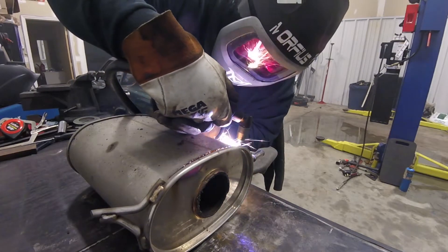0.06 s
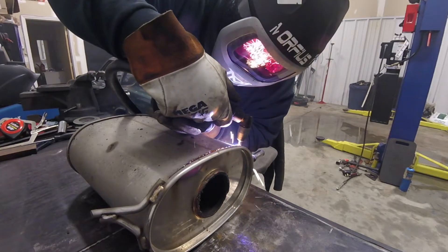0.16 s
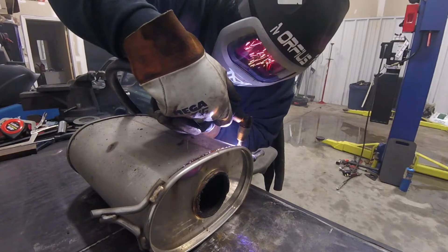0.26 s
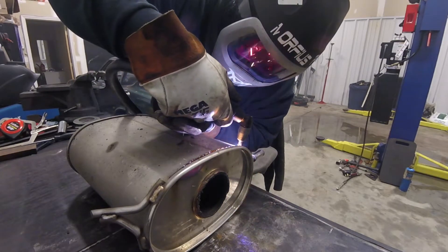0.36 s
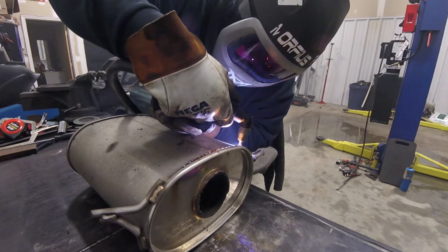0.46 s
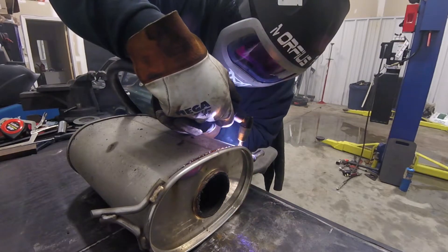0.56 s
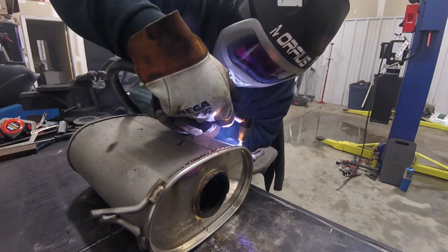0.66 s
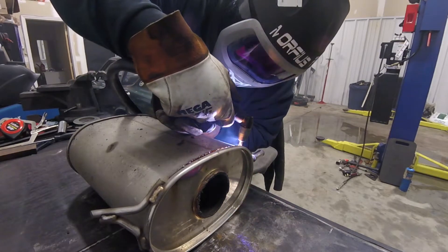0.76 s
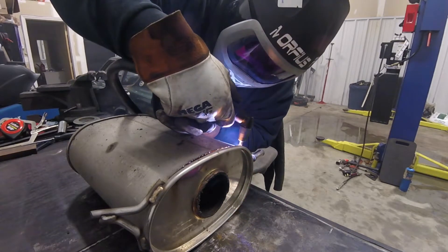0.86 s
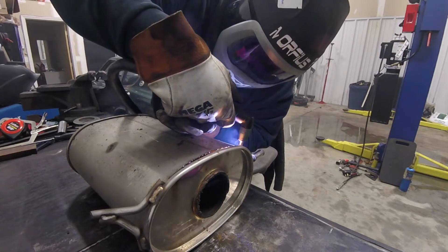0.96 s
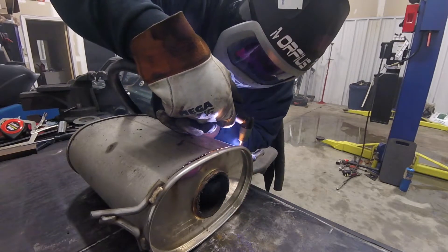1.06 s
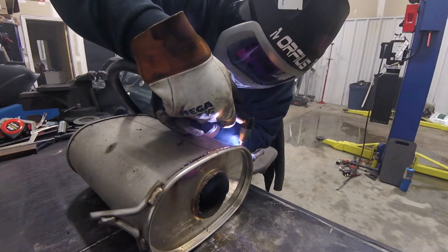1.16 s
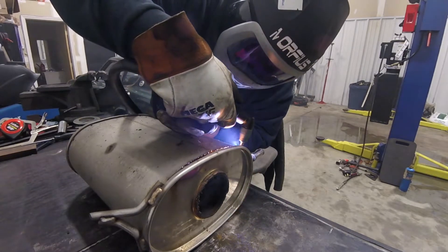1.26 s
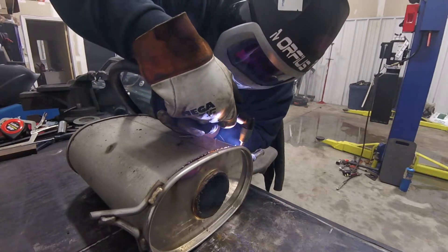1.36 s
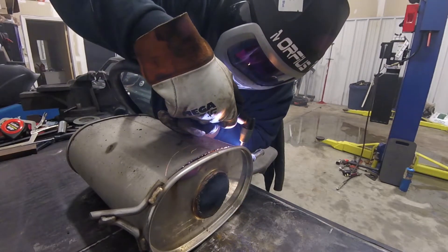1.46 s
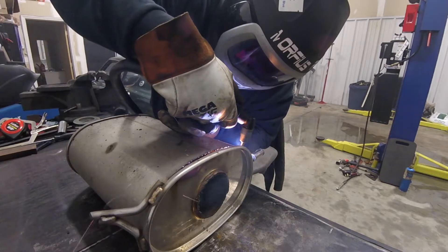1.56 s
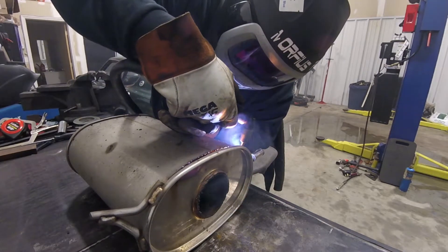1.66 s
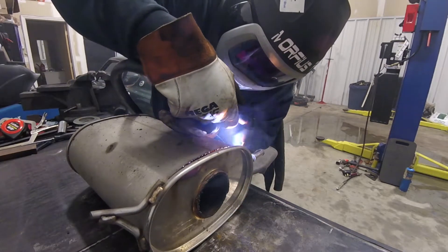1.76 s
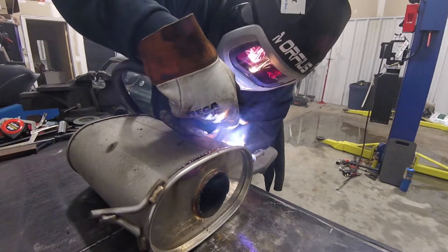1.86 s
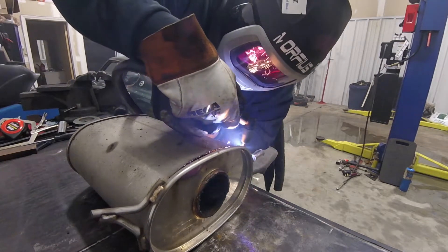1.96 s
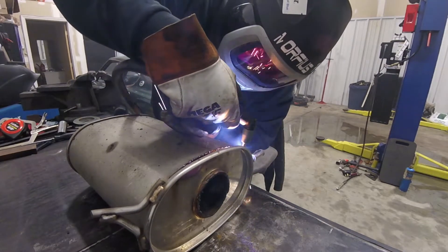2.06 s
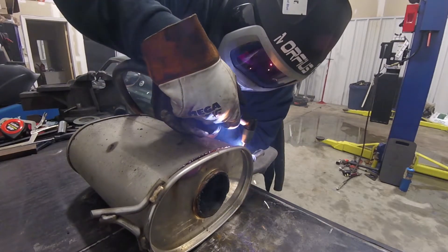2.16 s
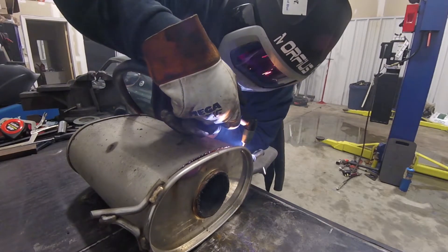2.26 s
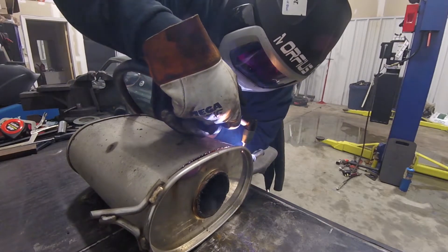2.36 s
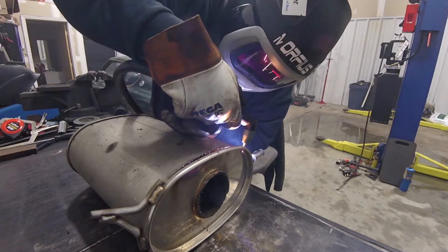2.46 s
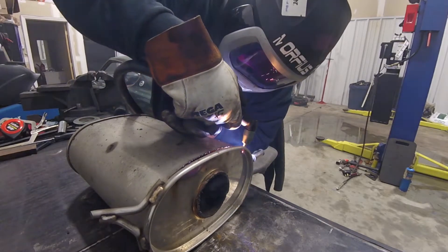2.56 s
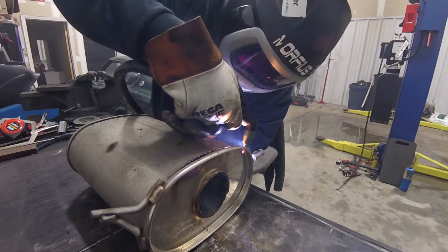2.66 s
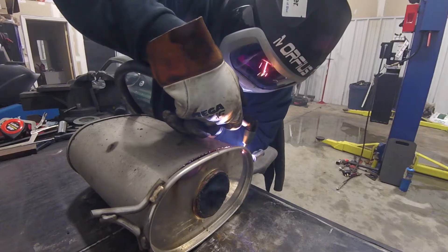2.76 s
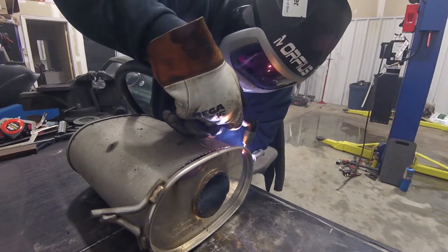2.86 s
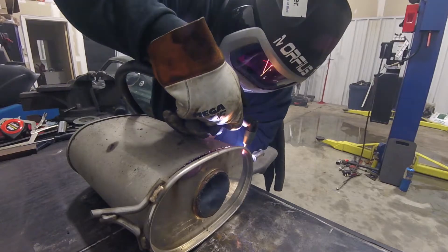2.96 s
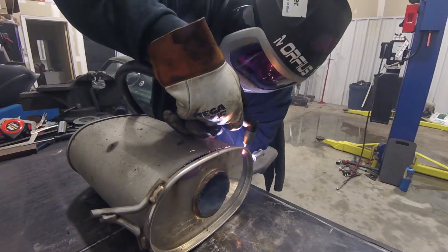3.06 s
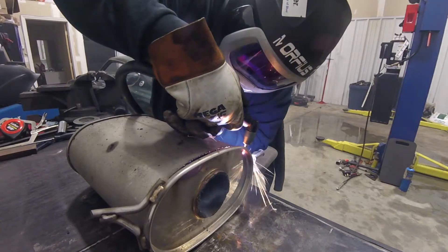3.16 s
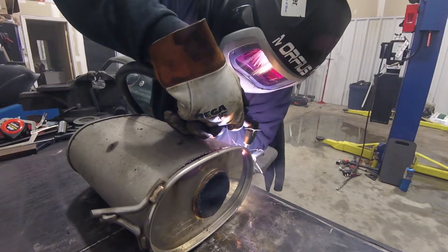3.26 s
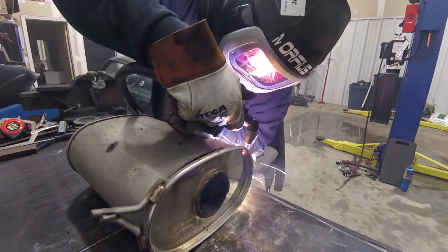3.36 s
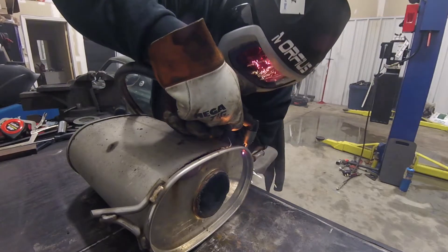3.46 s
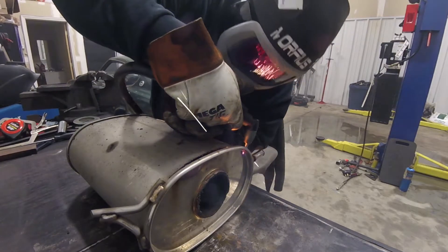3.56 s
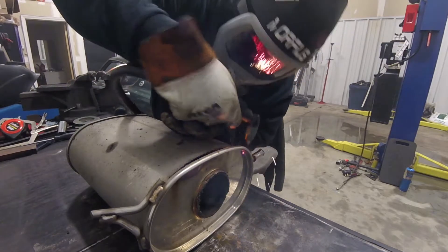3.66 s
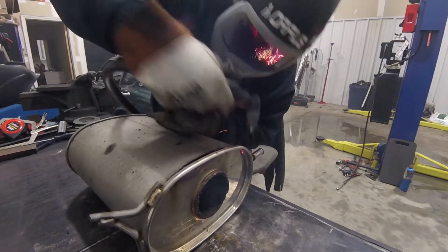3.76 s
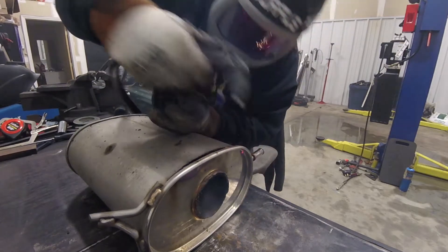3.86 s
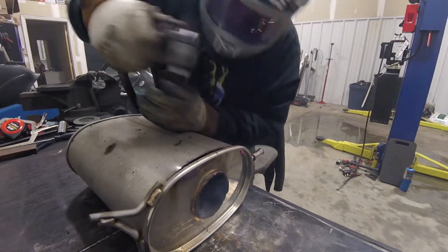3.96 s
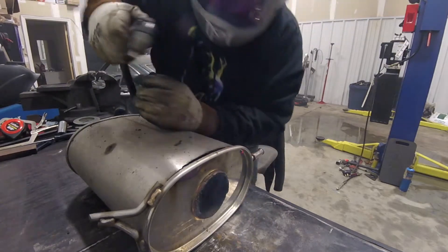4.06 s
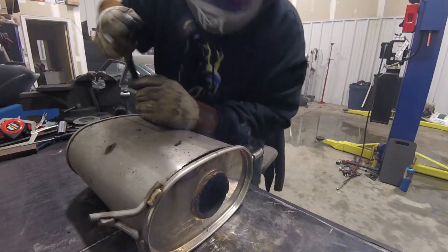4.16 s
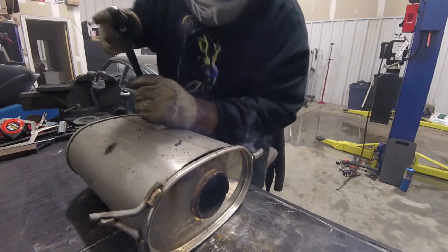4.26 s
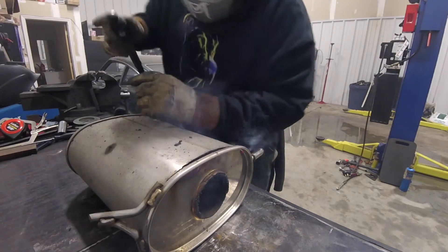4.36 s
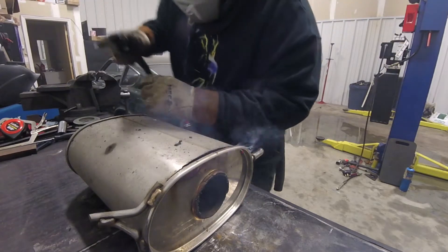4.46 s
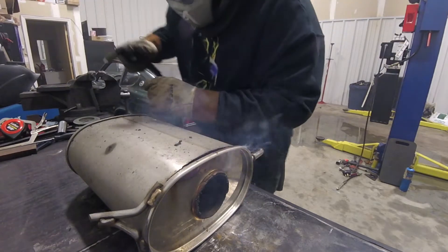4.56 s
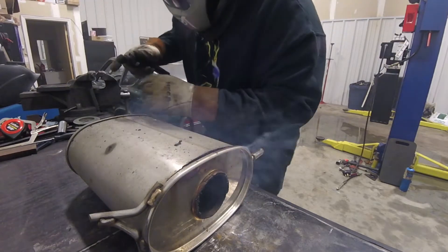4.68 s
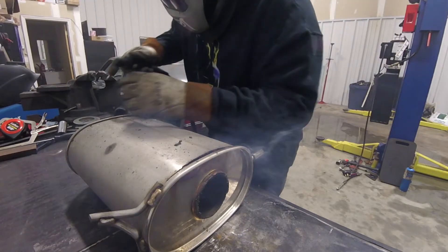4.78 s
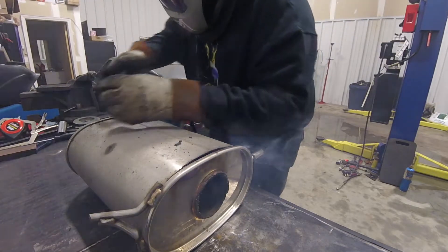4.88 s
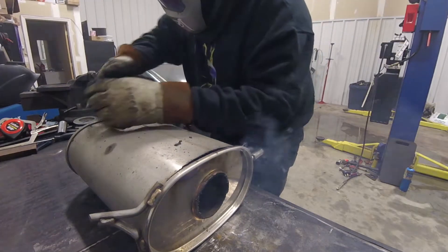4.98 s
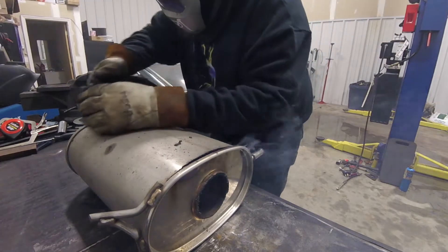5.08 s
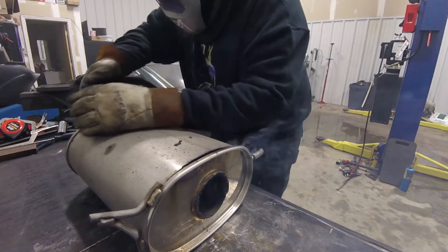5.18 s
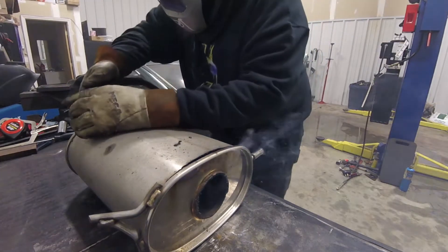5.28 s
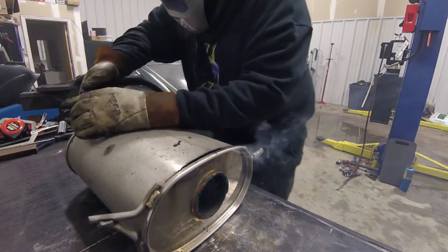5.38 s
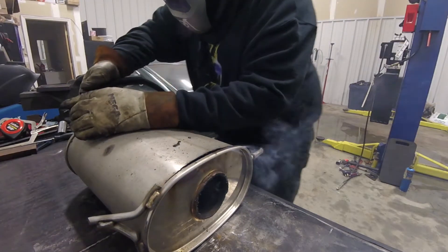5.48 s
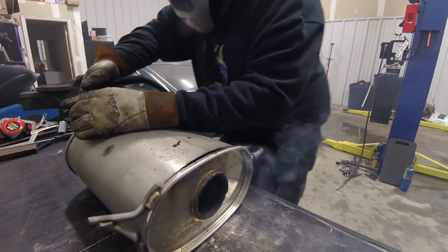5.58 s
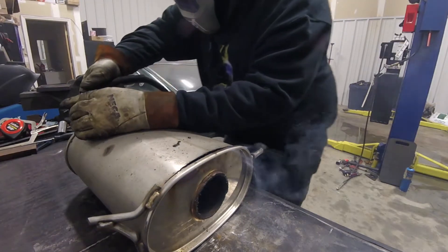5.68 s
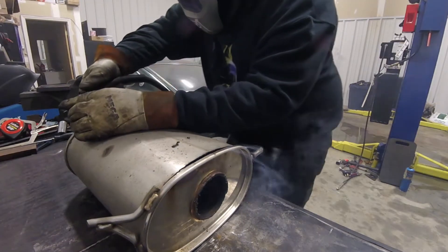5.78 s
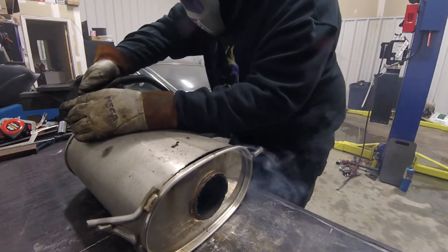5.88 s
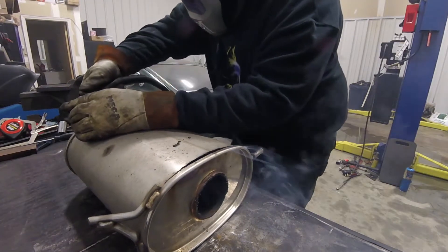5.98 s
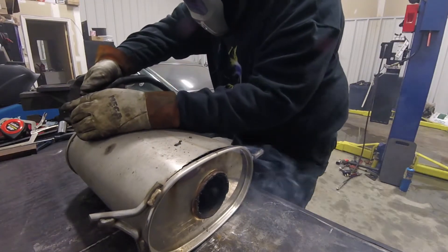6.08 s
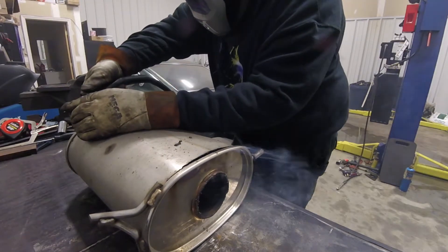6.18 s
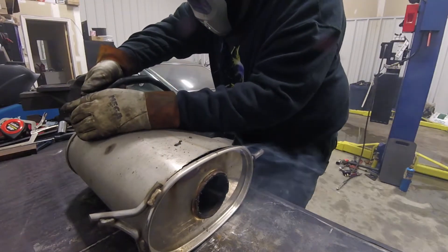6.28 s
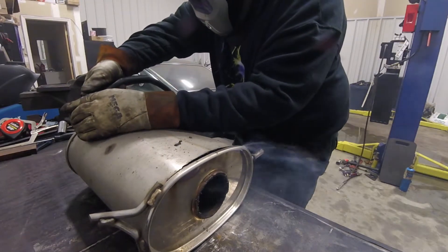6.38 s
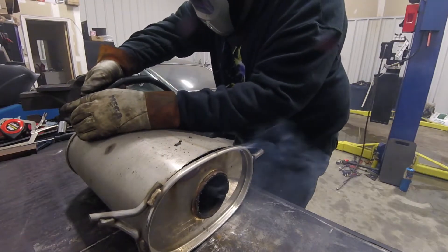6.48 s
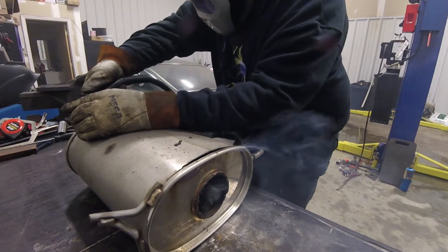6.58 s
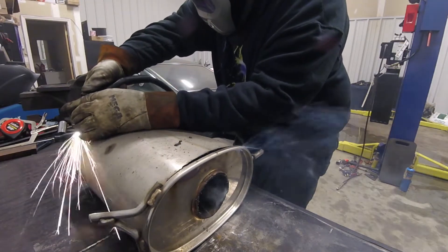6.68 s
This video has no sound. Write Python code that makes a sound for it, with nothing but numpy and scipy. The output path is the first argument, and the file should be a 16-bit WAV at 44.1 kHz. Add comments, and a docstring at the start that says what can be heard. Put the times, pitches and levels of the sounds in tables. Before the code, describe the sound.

Harsh, fluttering cutting-arc jet over hollow metal, cut dead by a loud pop, followed by quieter hissing cooling air and dull bumps on a bench.

```python
"""A roaring arc jet with a nozzle ring: a handheld plasma torch cuts a hollow steel shell in a workshop.
The arc snaps off with a pop; cooling air hisses on while the torch is lifted, swung and laid down, with low
thuds: a cluster of air puffs on the one microphone at the lift, then bumps on the bench; rumble, wavering hum.
Jet, roar, air and rumble are coloured noise with random swells; pop and thuds are clicks
ringing damped sines; the hum is a sine; nearby surfaces add short echoes and gliding bands."""
import sys
import numpy as np
from scipy import signal
from scipy.fft import rfft, irfft, next_fast_len
from scipy.io import wavfile
from scipy.ndimage import uniform_filter1d, map_coordinates

SR = 44100
rng = np.random.default_rng(int(sys.argv[2]) if len(sys.argv) > 2 else 0)


def dump_mix(stems):
    """Bounce the given channels to the path in sys.argv[1] as a 16-bit WAV at rate SR."""
    frames = np.atleast_2d(stems).T  # one column per channel
    limited = np.clip(frames, -1, 1)  # hard clip at full scale
    pcm = np.round(limited * 32767).astype(np.int16)
    wavfile.write(sys.argv[1], SR, pcm)


N = 296793

TURN_S, TURN_LENGTH_S = 2.25, 0.99   # hand turns the torch round the shell's shoulder
ARC_OFF_S = 3.4225
LIFT_S, LIFT_LENGTH_S = 3.83, 0.031   # torch leaves the shell
LAID_DOWN_S = 5.1


def amp(db):
    """Gain of a level in dB."""
    return 10 ** (np.asarray(db) / 20)


def in_time(rows):
    """Table columns as per-sample curves, linear between rows."""
    s, *columns = np.transpose(rows)
    return [np.interp(np.arange(N) / SR, s, c) for c in columns]


def ramp(t, start, length):
    """From 0 to 1 over length seconds, centred on start."""
    return np.clip((t - start) / length + .5, 0, 1)


def swell(t, s, rise, fall):
    """Bell of height 1 at s."""
    return np.exp(-((t - s) / np.where(t < s, rise, fall)) ** 2)


def resonance(hz, at, width, top_db):
    """Level in dB of a band of given centre, width and top."""
    return top_db / (1 + (2 * (hz - at) / width) ** 2)


def drift(rate_hz):
    """Slow random curve of spread 1: noise through a double pole at rate_hz."""
    step = 40   # samples per random value
    r = np.exp(-2 * np.pi * rate_hz * step / SR)
    settle = 2000
    noise = rng.standard_normal(N // step + settle + 2)
    slow = signal.lfilter([1], [1, -2 * r, r * r], noise)[settle:]
    return np.interp(np.arange(N) / step, np.arange(len(slow)), slow / slow.std())


def turbulence(spectrum, peaks, patchy_db, flutter_db):
    """Noise of a given colour, rms 1; bands swell on their own while the whole flutters."""
    size = next_fast_len(N)
    hz = np.maximum(np.arange(size // 2 + 1) * SR / size, 1)
    points_hz, points_db = np.transpose(spectrum)
    db = np.interp(np.log(hz), np.log(points_hz), points_db, left=-120, right=-120)
    db = db + sum(resonance(hz, *peak) for peak in peaks)
    shaped = rfft(rng.standard_normal(size)) * amp(db)
    place = 3 * np.log2(hz)   # in third octaves
    first = int(3 * np.log2(points_hz[0]))
    last = int(3 * np.log2(points_hz[-1])) + 1
    out = 0
    for k in range(first, last + 1):
        band = np.cos(np.pi / 2 * np.clip(place - k, -1, 1)) ** 2   # overlapping
        out = out + irfft(shaped * band, size)[:N] * amp(patchy_db * drift(4.0))
    out = out * amp(flutter_db * drift(28.0))
    return out / out.std()


def ring(clicks, hz, t60):
    """Two-pole resonator: a unit click rings a sine starting at height 1, down 60 dB after t60 seconds."""
    r, w = amp(-60 / (t60 * SR)), 2 * np.pi * hz / SR
    return signal.lfilter([0, np.sin(w)], [1, -2 * r * np.cos(w), r * r], clicks + 1e-18)


def evened(x):
    """Divide out the slow level so that the dB curves set it."""
    return x / np.sqrt(uniform_filter1d(x ** 2, size=SR // 4))


def echoed(x, echoes):
    """Sum with short echoes off nearby surfaces, as phase shifts of the spectrum; rms 1."""
    size = next_fast_len(N)
    khz = np.arange(size // 2 + 1) * SR / size / 1000
    response = 1 + sum(gain * np.exp(-2j * np.pi * khz * ms) for ms, gain in echoes)
    out = irfft(rfft(x, size) * response, size)[:N]
    return out / out.std()


# bands lifted or cut by shell reflections, plus the nozzle ring near 6.5 kHz, gliding as the torch travels: #
# [f at t=0/Hz, glide/(Hz/s), width/Hz, level before turn/dB, level after turn/dB]
GLIDES = [(1240, 10, 280, 2, -2), (2520, 8, 260, -1.3, 3), (4800, -10, 200, 0.2, -3),
          (3270, -10, 480, 3.5, 1.5), (4010, 183, 380, -7, -5.5), (4165, 116, 300, 4.5, 11.5),
          (5640, 97, 380, 1.8, 6.5), (5700, -200, 460, 0.5, -2.4), (6560, -85, 330, 3.5, 6.5),
          (6740, -10, 300, 0.2, -4), (7490, 122, 420, -6, -4.5), (8250, 450, 310, -1, 7),
          (9340, 550, 600, 2, 6), (9480, 250, 290, -8, -19), (10070, 500, 450, -3.7, -12),
          (11040, 300, 470, 4.5, .3), (11710, 200, 450, -14, -6)]


def reflections(x, share, shades=()):
    """Short-time filter: gliding bands (times share) and fixed shades, until the torch leaves the shell."""
    hz, t, z = signal.stft(x, SR, nperseg=1024)
    hz = hz[:, None]
    turned = ramp(t, TURN_S, TURN_LENGTH_S)
    db = 0
    for at, glide, width, before_db, after_db in GLIDES:
        top_db = share * (before_db + (after_db - before_db) * turned)
        db = db + resonance(hz, at + glide * t, width, top_db)
    db = db + sum(resonance(hz, *shade) for shade in shades)
    near_shell = 1 - ramp(t, LIFT_S, LIFT_LENGTH_S)
    return signal.istft(z * amp(db * near_shell), SR, nperseg=1024)[1][:N]


# rumble colour: [f/Hz, level/(dB per Hz)]
RUMBLE_SPECTRUM = [(12, -4), (25, -1), (45, -10), (70, -10.5), (140, -15), (300, -23)]
RUMBLE_DB, RUMBLE_LAID_DB = -50, -46   # rises as the torch is laid down
HUM_HZ, HUM_DB = 123.7, -57
STIR_CUT_HZ = 86


def shop():
    """Noise rumble, its deep part swelling at thuds, and the power supply's hum wavering in level and phase."""
    t = np.arange(N) / SR
    hum_gain = amp(HUM_DB + 2.0 * drift(3.2)) * np.sqrt(2)   # rms to peak
    hum = hum_gain * np.sin(2 * np.pi * HUM_HZ * t + 0.79 * drift(3.5))
    rumble = evened(turbulence(RUMBLE_SPECTRUM, [], patchy_db=1.0, flutter_db=.3))
    deep = signal.sosfilt(signal.butter(2, STIR_CUT_HZ, fs=SR, output="sos"), rumble)
    rumble_db = RUMBLE_DB + (RUMBLE_LAID_DB - RUMBLE_DB) * ramp(t, LAID_DOWN_S - .25, .6)
    return amp(rumble_db) * rumble + thud_stir(t) * deep + hum


# low thuds: a cluster of air puffs on the microphone as the torch lifts, then bumps on the bench:
# [t/s, level before high-pass/dB, f/Hz, t60/s, knock level re thud/dB]
THUDS = [(3.817, -20.5, 125, 0.058, -13), (3.837, -24, 75, .08, -25.), (3.861, -29, 111, .06, -27),
         (3.874, -24, 116, 0.069, -27), (3.895, -25, 101, 0.046, -25.), (5.409, -32, 110, 0.045, -2),
         (5.947, -30, 101, 0.087, -8.), (6.166, -18.5, 67, 0.13, -13)]
STIR_DB, STIR_RISE_S, STIR_FALL_S = -19, 0.058, .2   # level re thud


def thud_stir(t):
    """Gain of the deep rumble that swells after each thud; the strongest wins."""
    stir = 0
    for s, db, *_ in THUDS:
        since = np.maximum(t - s, 0)
        rise = 1 - np.exp(-(since / STIR_RISE_S) ** 2)
        stir = np.maximum(stir, amp(db + STIR_DB) * rise * np.exp(-since / STIR_FALL_S))
    return stir


# higher modes over each thud: [f/Hz, t60/s]
KNOCK_MODES = [(380, 0.05), (560, 0.056)]


def thuds():
    """Low damped sines, each with a knock of higher modes; the deepest push is lost."""
    out = np.zeros(N)
    for s, db, hz, t60, knock_db in THUDS:
        click = np.zeros(N)
        click[round(s * SR)] = amp(db)
        knock = sum(ring(click, mode_hz, mode_t60) for mode_hz, mode_t60 in KNOCK_MODES)
        out += ring(click, hz, t60) + amp(knock_db) * knock
    return signal.sosfilt(signal.butter(2, 40, "high", fs=SR, output="sos"), out)


# splash colour: [f/Hz, level/(dB per Hz)]
SPLASH_SPECTRUM = [(88, -32), (150, -11.5), (385, -4), (488, -9.5), (546, -6), (723, -11), (2200, 0.5),
                   (2860, -3), (4840, -120)]
# hollow in the splash beside the shell: [f/Hz, width/Hz, level/dB]
SPLASH_SHADES = [(970, 160, -5.5)]


def air_splash():
    """Lower-pitched noise of the air jet striking a surface."""
    splash = turbulence(SPLASH_SPECTRUM, [(760, 410, 3.4)], patchy_db=0.96, flutter_db=0.3)
    return reflections(splash, 0, SPLASH_SHADES)


# hiss colour: [f/Hz, level/(dB per Hz)]
HISS_SPECTRUM = [(710, -23), (1200, -16), (1390, -22.5), (2440, -9.5), (2980, -6), (3240, -5), (3950, -3.5),
                 (4250, -3.5), (4570, -3.5), (6390, -1.5), (12200, -23.5), (13700, -36), (14600, -30)]
# bands of the hiss throughout: [f/Hz, width/Hz, level/dB]
AIR_PEAKS = [(2920, 960, -1.5), (5720, 290, 2.5), (6520, 290, 3), (9150, 530, 4), (9950, 300, 3),
             (10700, 600, 3), (12030, 490, -11), (13140, 2600, 9.5)]
# added bands of the hiss once the torch lies on the bench; the top two only shape the treble slope:
# [f/Hz, width/Hz, level/dB]
LYING_PEAKS = [(2450, 440, 6.5), (2800, 120, -4), (2950, 72, 8.5), (3300, 200, -2), (3330, 100, 1.5),
               (3670, 180, -2.5), (3960, 95, 0), (4270, 180, -3), (4570, 250, 4.5), (5040, 370, 4.),
               (5830, 160, 2.5), (7540, 230, 3.), (10270, 440, -12), (12550, 500, -6), (13600, 600, 5)]
# echoes, torch in the hand: [delay/ms, gain]
HELD_ECHOES = [(.36, .07), (.45, 0.067), (.63, .08)]
# echoes, torch on the bench: [delay/ms, gain]
BENCH_ECHOES = [(.78, .06), (1.73, .09), (2.01, .09)]
# echo off the hand as it swings the torch: [t/s, delay/ms, gain]
SWING_ECHO = [(3.75, .31, .02), (3.9, 0.35, 0.12), (4.15, 0.36, .13), (4.4, .385, .15), (4.65, 0.36, 0.14),
              (4.85, .33, .13), (5.1, 0.26, .1)]
# echo as the torch nears the bench: [t/s, delay/ms, gain]
CLOSING_ECHO = [(4.0, 2.7, 0), (4.4, 2.3, .1), (4.75, 1.9, .14), (5.1, 1.75, .12)]
# shading of the hiss beside the shell: [f/Hz, width/Hz, level/dB]
HISS_SHADES = [(2200, 900, 3), (3570, 150, 4), (4500, 700, -2.5), (8300, 1200, -1.5), (12060, 2900, -9)]
AIR_GLIDE_SHARE = 0.27   # of the gliding bands' dB


def air_hiss(t):
    """Jet noise with moving echoes in the hand, crossfaded to another colour once laid down."""
    held = turbulence(HISS_SPECTRUM, AIR_PEAKS, patchy_db=1.2, flutter_db=0.42)
    held = echoed(held, HELD_ECHOES)
    for echo in (SWING_ECHO, CLOSING_ECHO):
        delay_ms, gain = in_time(echo)
        held = held + gain * map_coordinates(held, [(t - delay_ms / 1000) * SR], order=3)
    lying = turbulence(HISS_SPECTRUM, AIR_PEAKS + LYING_PEAKS, patchy_db=0.47, flutter_db=0.4)
    lying = echoed(lying, BENCH_ECHOES)
    laid = np.clip((t - LAID_DOWN_S) / 0.074, 0, 1)
    hiss = np.sqrt(1 - laid) * held + np.sqrt(laid) * lying
    return evened(reflections(hiss, AIR_GLIDE_SHARE, HISS_SHADES))


# hiss level before sweeps: [t/s, level/dB]
HISS_LEVEL = [(3.43, -23), (3.46, -28.5), (3.72, -28), (3.83, -28), (3.92, -29.2), (4.3, -31.5),
              (4.5, -33.5), (4.65, -32.5), (5.07, -32.5), (5.17, -28), (5.3, -28), (5.47, -25.7),
              (5.7, -28), (6.0, -26), (6.2, -27), (6.35, -25.5), (6.66, -25.5), (6.73, -27)]
# jet sweeps across an edge:
# [t/s, hiss swell/dB, rise/s, fall/s, splash swell/dB, splash rise/s, splash fall/s]
SWEEPS = [(3.755, 5.5, .02, .022, 4.5, 0.074, 0.054), (5.121, 6.5, .012, .012, 6.5, .04, 0.033)]
SPLASH_DB, SPLASH_FREE_DB = -36.5, -44   # jet close to a surface; in free air; both before sweeps


def cooling_air():
    """Hiss plus surface splash, heard from arc-off; both swell as the jet sweeps across an edge."""
    t = np.arange(N) / SR
    free = ramp(t, LIFT_S, LIFT_LENGTH_S) - ramp(t, LAID_DOWN_S - .02, 0.036)
    hiss_db, = in_time(HISS_LEVEL)
    splash_db = SPLASH_DB + (SPLASH_FREE_DB - SPLASH_DB) * free
    for s, swell_db, rise, fall, splash_swell_db, splash_rise, splash_fall in SWEEPS:
        hiss_db = hiss_db + swell_db * swell(t, s, rise, fall)
        splash_db = splash_db + splash_swell_db * swell(t, s, splash_rise, splash_fall)
    return (t > ARC_OFF_S) * (amp(hiss_db) * air_hiss(t) + amp(splash_db) * air_splash())


NOZZLE_HZ = 6200


def pop():
    """The arc column collapses: a sharp pressure step that rings nozzle and shell."""
    click = np.zeros(N)
    click[round(ARC_OFF_S * SR)] = -1
    out = amp(-2.5) * ring(click, 2350, 0.0029)
    out += amp(-5.0) * ring(click, NOZZLE_HZ, 0.0056)
    out += amp(-28.0) * ring(click, 10500, 0.0026)
    out += amp(-15.5) * ring(click, 370, 0.016)
    out += amp(-25.0) * ring(click, 140, 0.046)
    return out


# roar colour: [f/Hz, level/(dB per Hz)]
ROAR_SPECTRUM = [(20, -13), (60, -11.5), (200, -14), (450, -7), (560, -5.5), (900, -17)]
# hollow-shell bands: [f/Hz, width/Hz, level/dB]
ROAR_PEAKS = [(129.5, 58, 10), (341, 170, 5), (630, 52, -42)]
ROAR_DB, ROAR_FADE_DB_PER_S = -32.5, 4   # level before arc()'s steady 1.08 gain; fade from TURN_S


def shell_roar(t):
    """Low noise inside the hollow shell; holds, then fades from the turn on."""
    roar = turbulence(ROAR_SPECTRUM, ROAR_PEAKS, patchy_db=2.0, flutter_db=0.8)
    return amp(ROAR_DB - ROAR_FADE_DB_PER_S * np.maximum(t - TURN_S, 0)) * roar


# jet colour: [f/Hz, level/(dB per Hz)]
JET_SPECTRUM = [(350, -44), (600, -15), (1220, -8.5), (2160, -4.5), (2570, -5.5), (3450, -7.5),
                (4220, -5.5), (4760, -5), (6460, -1), (7590, -4.5), (11000, -17.5), (12300, -24),
                (13700, -25), (14600, -37)]
# jet bands: [f/Hz, width/Hz, level/dB]
JET_PEAKS = [(1204, 140, 2), (1550, 220, 1.5), (2190, 120, 0.5), (2540, 260, -0.5), (3530, 244, 5.5),
             (3910, 205, 5.5), (4835, 190, 6.5), (5270, 300, 4), (8400, 180, 0.5)]
# jet echoes: [delay/ms, gain]
JET_ECHOES = [(1.62, -0.066), (2.49, 0.086)]
# jet level before arc()'s steady 1.08 gain: [t/s, level/dB]
JET_LEVEL = [(0, -16), (.2, -14.5), (.48, -14.5), (.62, -16), (.88, -16.5), (1, -15.5), (1.3, -16.5),
             (1.72, -16.3), (1.93, -13.5), (2.12, -17.5), (2.19, -15), (2.45, -16), (2.75, -14.5),
             (2.85, -15.5), (3.05, -15), (3.24, -13), (3.3, -16), (3.35, -14.5)]
FLARE_FROM_DB, FLARE_PER_DB = -14.5, 0.2   # threshold on JET_LEVEL; added band gain per dB above
FLARE_LOW_HZ, FLARE_HIGH_HZ = 5500, 6460


def arc_jet():
    """Jet noise coloured by echoes and shell; louder moments ring more in the nozzle band."""
    jet = turbulence(JET_SPECTRUM, JET_PEAKS, patchy_db=0.78, flutter_db=0.44)
    jet_db, = in_time(JET_LEVEL)
    nozzle_band = signal.butter(1, [FLARE_LOW_HZ, FLARE_HIGH_HZ], "band", fs=SR, output="sos")
    nozzle = signal.sosfilt(nozzle_band, jet)
    jet = jet + FLARE_PER_DB * np.maximum(jet_db - FLARE_FROM_DB, 0) * nozzle
    return amp(jet_db) * evened(reflections(echoed(jet, JET_ECHOES), share=1))


def arc():
    """Jet and shell roar; at arc-off the jet collapses in ms and the room follows."""
    t = np.arange(N) / SR
    after = np.maximum(t - ARC_OFF_S, 0)
    dying = 0.85 * np.exp(-after / 0.0014) + 0.23 * np.exp(-after / 0.023)   # 1.08 while cutting
    return dying * (arc_jet() + shell_roar(t))


def scene():
    """All sources reach one microphone, fed to two equal channels."""
    return np.tile(shop() + thuds() + cooling_air() + pop() + arc(), (2, 1))


CUTOFF_HZ = 14450


def record(dry):
    """Clip at full scale, then steep low-pass."""
    lowpass = signal.ellip(12, .5, 70, CUTOFF_HZ, fs=SR, output="sos")
    return signal.sosfilt(lowpass, np.clip(dry, -1, 1))


dry = scene()
out = record(dry)
dump_mix(out)
```